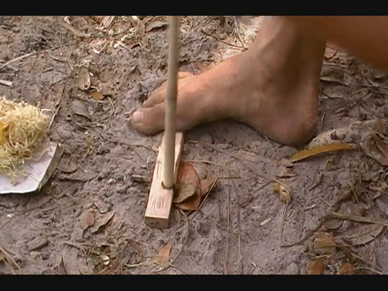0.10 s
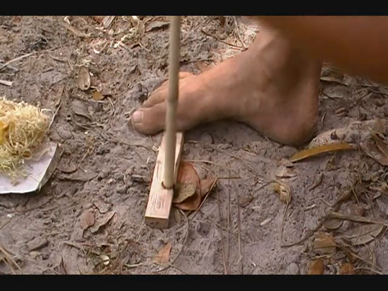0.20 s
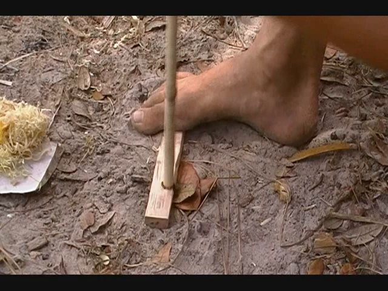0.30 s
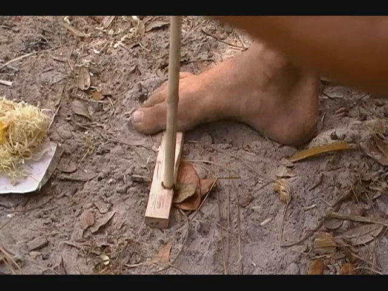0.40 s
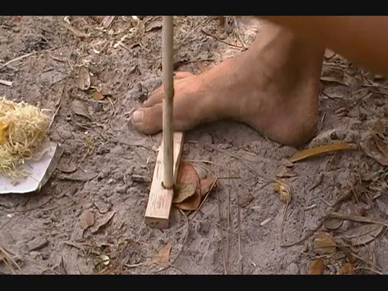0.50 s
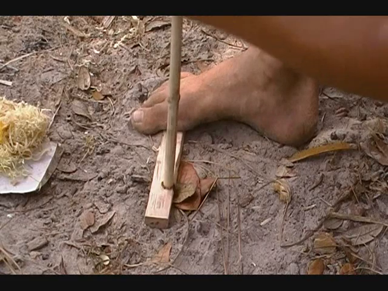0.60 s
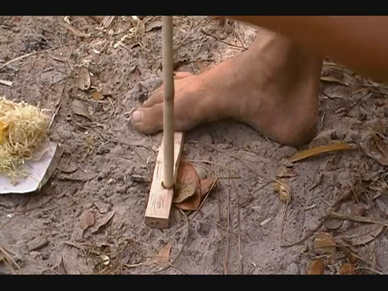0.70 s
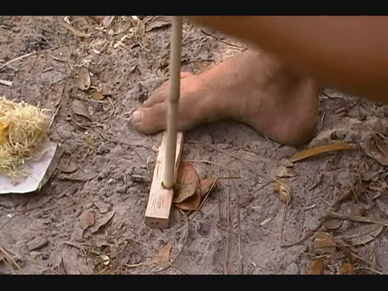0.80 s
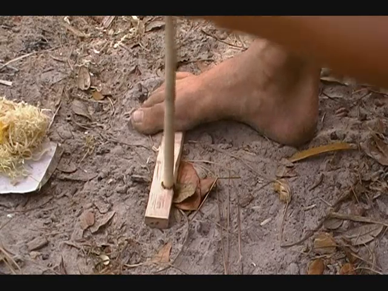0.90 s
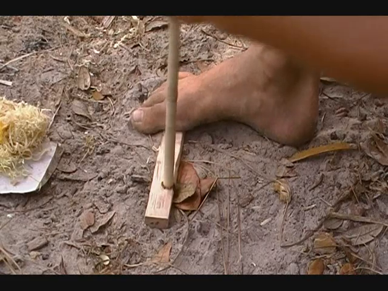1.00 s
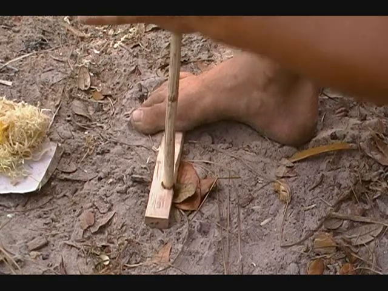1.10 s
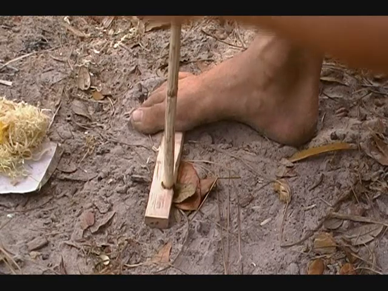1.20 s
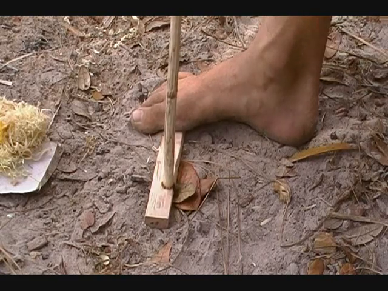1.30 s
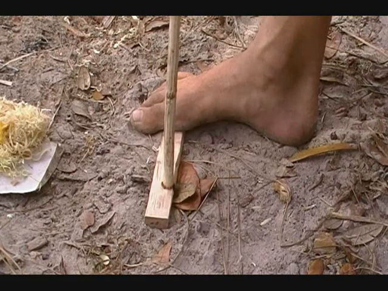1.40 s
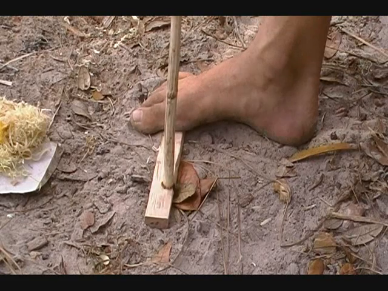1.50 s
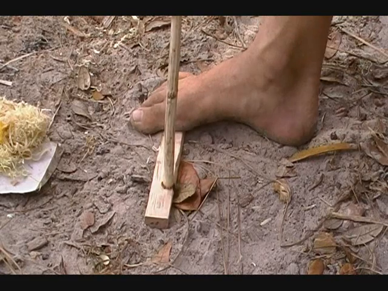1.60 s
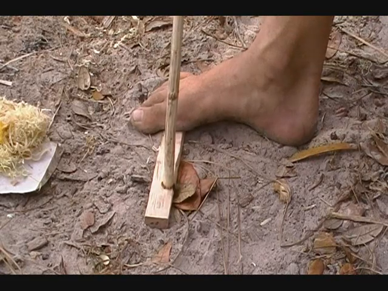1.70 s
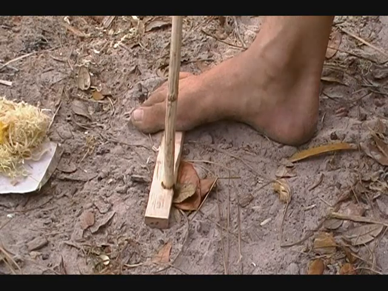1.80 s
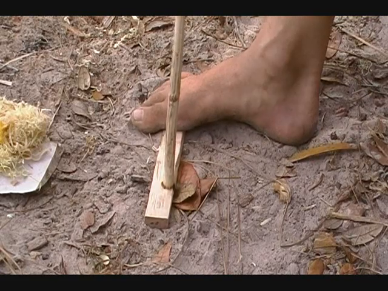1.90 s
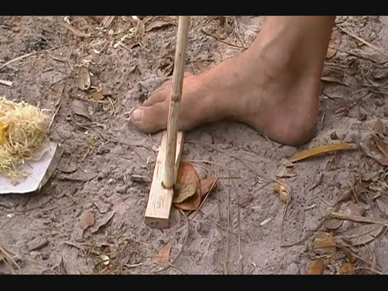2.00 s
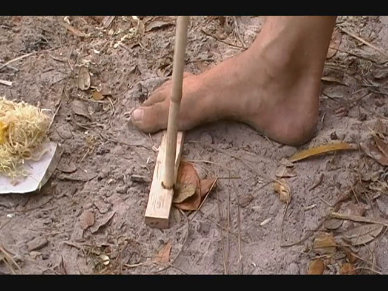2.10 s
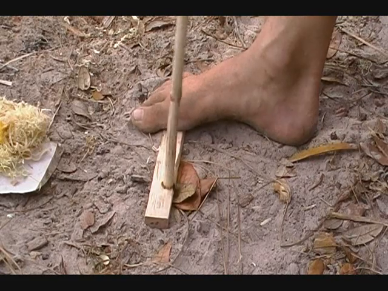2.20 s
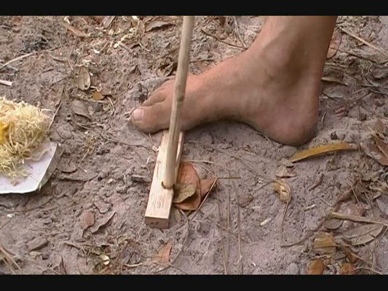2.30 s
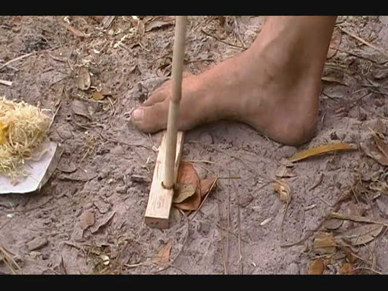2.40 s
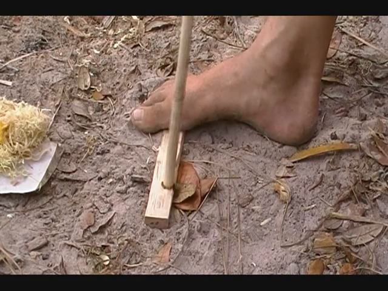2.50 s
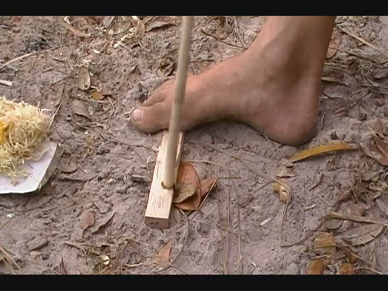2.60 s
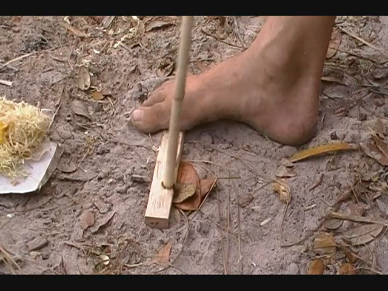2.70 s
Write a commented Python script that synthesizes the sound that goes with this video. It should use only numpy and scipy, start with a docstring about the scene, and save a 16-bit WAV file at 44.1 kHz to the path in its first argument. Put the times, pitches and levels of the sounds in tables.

```python
"""A wooden spindle is rolled between the palms in the socket of a board, in front of the microphone outdoors:
about nine dry, gritty strokes a second, made of friction noise and wood modes that follow the turning speed.
It pauses while the hands go back to the top; the wood rings briefly, as short tones, where the tip catches.
Behind it a motor vehicle, probably a six-cylinder, drones past as harmonic lines with a wash of tyre noise."""
import sys
import numpy as np
from scipy import signal
from scipy.fft import rfft, irfft
from scipy.io import wavfile

SR = 44100
rng = np.random.default_rng(int(sys.argv[2]) if len(sys.argv) > 2 else 0)


def transcribe(u):
    """Save the signal u as a 16-bit wav file named by the first command-line argument.

    u: samples, shape (n,) or (channels, n), limited to [-1, 1]; the rate is SR.
    q: integer samples, one column per channel.
    """
    v = np.clip(np.atleast_2d(u).T, -1, 1)
    q = np.round(v * 32767).astype(np.int16)
    wavfile.write(sys.argv[1], SR, q)


N = 121275
T = np.arange(N) / SR  # t/s


def undb(db):
    """Amplitude factor of a level in dB."""
    return 10 ** (np.asarray(db) / 20)


def unit(x):
    """Scale to an RMS of 1."""
    return x / np.sqrt(np.mean(x ** 2))


def curve(rows, axis=1):
    """One column of a table, joined by straight lines in time."""
    rows = np.array(rows)
    return np.interp(T, rows[:, 0], rows[:, axis])


def shape(x, points):
    """Filter by (f/Hz, gain/dB) points, joined on a logarithmic frequency axis."""
    hz, db = np.array(points).T
    f = np.maximum(np.arange(N // 2 + 1) * SR / N, 1)
    gain = undb(np.interp(np.log(f), np.log(hz), db))
    return irfft(rfft(x) * gain, N)


def noise():
    """White noise with spread 1."""
    return rng.standard_normal(N)


def walk(rate):
    """Smooth chance with spread 1, changing about rate times a second."""
    f = np.arange(N // 2 + 1) * SR / N
    return unit(irfft(rfft(noise()) / (1 + (f / rate) ** 4), N))


def ring(hz, width_hz):
    """A resonance driven by friction: a narrow band of noise whose centre may move."""
    phase = 2 * np.pi * np.cumsum(hz + 0 * T) / SR
    in_phase = walk(width_hz / 2) * np.cos(phase)
    quadrature = walk(width_hz / 2) * np.sin(phase)
    return unit(in_phase + quadrature)


def stereo(mid, side):
    """Left and right from mid and side."""
    return np.array([mid + side, mid - side])


DRILL_SIDE_DB = -9  # side relative to mid


def wide(make):
    """Stereo image from two independent draws: one in the middle, a weaker one at the sides."""
    return stereo(make(), undb(DRILL_SIDE_DB) * make())


GRAINS_PER_S, GRAIN_SPREAD_DB = 9000, 1


def grit(colour):
    """Dense tiny slips of wood fibre and dust, coloured by the wood."""
    happens = rng.random(N) < GRAINS_PER_S / SR
    size = undb(GRAIN_SPREAD_DB * np.minimum(rng.exponential(size=N), 4))
    slips = happens * size * np.sign(noise())
    return unit(shape(slips, colour))


# strokes of the spindle: start t/s, length t/s, rasp level/dB, hiss level/dB, low ring level/dB,
# fastest point [share of the stroke]
STROKES = [(-.035, 0.1, -41, -42, -53, 0.46), (0.067, 0.11, -37, -43.5, -72, 0.48),
           (0.179, 0.11, -40.5, -42, -53, 0.37), (0.289, 0.11, -38, -45, -57, 0.38),
           (0.396, 0.11, -39.5, -43, -57, 0.38), (0.503, 0.12, -39.5, -44, -56, 0.37),
           (0.608, 0.12, -40, -43.5, -48, 0.37), (0.722, 0.11, -39.5, -44.5, -70, 0.44),
           (0.832, 0.12, -41, -44.5, -51, 0.3), (0.94, .1, -42, -47, -65, 0.46),
           (1.055, .108, -40.5, -45, -61, 0.33), (1.163, 0.12, -48.5, -50.5, -57, 0.4),
           (2.282, 0.15, -46, -44, -53, 0.54), (2.433, 0.098, -38.5, -37.5, -48, 0.47),
           (2.545, .096, -41, -39.5, -49, 0.365), (2.649, 0.11, -40.5, -38, -42, 0.36)]
# modes of board and spindle: f/Hz, width f/Hz, level/dB relative to the rasp
WOOD_MODES = [(2308, 150, -21.5), (2860, 100, -18), (3287, 100, -15), (3956, 380, -11.5), (4414, 880, -8),
              (4970, 840, -14), (5710, 910, -14)]
# colour of the rasping wood fibre: f/Hz, level/dB
RASP_COLOUR = [(500, -16.5), (1500, -6.5), (2100, -8), (2700, -0.5), (3100, -3.5), (3500, 2), (4400, 0),
               (5300, 4), (6200, -2.5), (7300, -6.5), (10000, -16), (16000, -45)]
# colour of the hissing dust, also heard in scuffs and slides: f/Hz, level/dB
HISS_COLOUR = [(2000, -69), (4500, -1), (6000, 1.5), (7200, 1.5), (8500, 4.5), (10000, 2.5), (12000, -2.5),
               (14500, -10.5), (16000, -21)]
RASP_POWER, HISS_POWER = 1.21, 1.43  # how steeply each level follows the speed
LOW_RING_HZ, LOW_RING_WIDTH_HZ = 2260, 670  # centre at full speed
RING_RISE = .22  # share by which the low ring is higher when the spindle stands still
WOOD_FLICKER_DB, CHATTER_DB = 8, 1.0
BROAD_DB = -2.5  # broad grit relative to the rasp
REVERSAL_DB = -19.5  # dust that keeps moving while the spindle turns round, relative to the stroke's hiss


def spindle():
    """Each stroke speeds up from rest and slows again; rasp, hiss and low ring follow its speed.
    The turning tip drives now one mode of the wood, now another."""
    rasp, hiss, low, pace, dust = (np.zeros(N) for _ in range(5))
    for start, length, rasp_db, hiss_db, low_db, fastest in STROKES:
        turn = np.interp(T, [start, start + length * fastest, start + length], [0, .5, 1])
        speed = np.abs(np.sin(np.pi * turn))
        rasp += undb(rasp_db) * speed ** RASP_POWER
        hiss += undb(hiss_db) * speed ** HISS_POWER
        low += undb(low_db) * speed ** 2
        pace += speed
        from_middle = (T - start - length / 2) / (0.48 * length)
        dust += undb(hiss_db + REVERSAL_DB) * np.exp(-from_middle ** 4)

    wood = np.zeros((2, N))
    for hz, width, db in WOOD_MODES:
        flicker = WOOD_FLICKER_DB * np.tanh(walk(23))
        wood += undb(db + flicker) * wide(lambda: ring(hz, width))
    broad = undb(BROAD_DB) * wide(lambda: grit(RASP_COLOUR))
    low_hz = LOW_RING_HZ * (1 + RING_RISE * (1 - pace))

    sound = rasp * (wood + broad)
    sound += np.hypot(hiss, dust) * wide(lambda: grit(HISS_COLOUR))
    sound += low * wide(lambda: ring(low_hz, LOW_RING_WIDTH_HZ))
    return sound * undb(CHATTER_DB * walk(110))


# the tip catches and the wood sings briefly: t/s, f/Hz, level/dB
CATCHES = [(0.043, 4400, -45), (.108, 3404, -37.5), (0.137, 3350, -35), (0.203, 3200, -36),
           (0.211, 3400, -34), (.216, 4280, -37), (.252, 4350, -38), (.355, 3350, -38),
           (0.419, 2450, -40.5), (0.423, 3335, -36), (0.427, 2800, -44), (.572, 3400, -38),
           (0.643, 2976, -36), (.648, 3970, -36), (.652, 5100, -36), (0.789, 2950, -38),
           (.786, 3580, -41.5), (.805, 2250, -46.5), (0.855, 2850, -41), (.908, 2900, -49),
           (.985, 3400, -41), (0.999, 2400, -43), (1.078, 2850, -47), (1.113, 4500, -35.5),
           (1.121, 2827, -40.5), (2.381, 3950, -42), (2.452, 3930, -39), (2.48, 4400, -40),
           (2.586, 2000, -40.5), (2.608, 3330, -38), (2.697, 2200, -40), (2.718, 5000, -37)]
CATCH_S, CATCH_WIDTH_HZ = 0.0095, 425.5  # half width in time (to 1/e), spread of the wobbling pitch
CATCH_GRIT_DB = 2.8  # rough flicker of the level


def catches():
    """Stick and slip lock on to a mode of the wood for a few milliseconds."""
    out = np.zeros((2, N))
    wobble_hz = CATCH_WIDTH_HZ / 2 * walk(CATCH_WIDTH_HZ)
    for at, hz, db in CATCHES:
        phase = 2 * np.pi * (np.cumsum(hz + wobble_hz) / SR + rng.random())
        swell = np.exp(-((T - at) / CATCH_S) ** 2)
        out += undb(db) * swell * np.sin(phase)
    return out * undb(CATCH_GRIT_DB * wide(lambda: walk(350)))


# knocks and scuffs of the spindle in its socket, some as a stroke breaks away:
# t/s, wood level/dB, hiss level/dB, decay t/s (to 1/e)
SCUFFS = [(.174, -41, -62, .003), (.186, -45, -57, 0.0087), (1.898, -44, -58, 0.0046),
          (2.178, -44, -59.5, 0.019), (2.442, -47, -47, .008), (2.548, -49.5, -39.5, 0.016),
          (2.656, -43.5, -37, 0.0074)]
# palms slide up the stick: t/s, half width t/s (to 1/e), level/dB
SLIDES = [(1.87, 0.019, -58.5), (2.19, .03, -68), (2.3, 0.016, -57)]
# colour of the knocked wood: f/Hz, level/dB
KNOCK_COLOUR = [(400, -19), (1500, -1), (2400, 8), (3500, 0), (5600, -10), (8000, -13), (15000, -35)]


def handling():
    """The spindle knocks in its socket with a sudden start and a decay; the palms slide along it."""
    knocks, rubs = np.zeros(N), np.zeros(N)
    for at, wood_db, hiss_db, decay in SCUFFS:
        fade = (T >= at) * np.exp(-np.abs(T - at) / decay)
        knocks += undb(wood_db) * fade
        rubs += undb(hiss_db) * fade
    for at, half, db in SLIDES:
        rubs += undb(db) * np.exp(-((T - at) / half) ** 2)
    return knocks * wide(lambda: grit(KNOCK_COLOUR)) + rubs * wide(lambda: grit(HISS_COLOUR))


SCATTER_DB, SCATTER_T60_S = -13.5, 0.12


def scatter_tail():
    """Decaying noise of unit energy that begins 4 ms after the direct sound."""
    coloured = shape(noise(), [(3000, -2), (7000, -10.5), (14000, -4)])
    tail = coloured * undb(-60 * T / SCATTER_T60_S) * (T > .004)
    return unit(tail) / np.sqrt(N)


def surroundings(x):
    """Ground and leaves scatter a short, dull tail back."""
    echo = [signal.fftconvolve(channel, scatter_tail())[:N] for channel in x]
    return x + undb(SCATTER_DB) * np.array(echo)


# firing rate of the engine: t/s, f/Hz
FIRING = [(0, 102.8), (.3, 108.3), (.6, 114.8), (.75, 118.9), (.9, 124.2), (1.05, 126), (1.2, 128.1),
          (1.35, 130.1), (1.5, 125.7), (1.65, 120), (1.8, 116.5), (1.95, 113.1), (2.1, 107.1), (2.39, 103),
          (2.54, 99.3), (2.75, 102.2)]
# strongest engine lines: t/s, level/dB at 1, 4/3, 3/2, 2, 7/6 and 5/3 times the firing rate
DRONE = [(0, -43.5, -61, -47, -67, -46, -44), (.27, -38.5, -79, -44, -60, -42, -44),
         (.55, -35, -49, -39.5, -58, -43, -53), (.75, -30, -51, -36.5, -59, -57, -54),
         (.86, -31, -40, -45.5, -58, -56, -57), (1.03, -26.5, -37.5, -45, -47, -57, -55),
         (1.11, -20, -36.5, -46, -37.5, -50, -47), (1.19, -18.5, -37.5, -47, -41, -48, -47),
         (1.31, -26.5, -40.5, -44.5, -48, -43, -53.5), (1.44, -21.5, -37, -48, -37.5, -45, -46),
         (1.55, -19, -34, -36, -37, -47, -46), (1.74, -29, -45, -42, -48, -49, -49),
         (1.9, -34, -43, -67, -45, -41, -65), (1.96, -29.5, -44, -36, -64, -61, -63),
         (2.005, -54, -36.5, -50, -67, -48, -54), (2.06, -31.5, -38.5, -43, -69, -56, -48),
         (2.18, -36.5, -48, -55, -67, -59, -53), (2.35, -35.5, -60, -38.5, -54, -55, -48.5),
         (2.47, -35.5, -66, -37.5, -56, -61, -50), (2.57, -49, -65, -42.5, -60, -44, -66),
         (2.64, -50, -60, -42.5, -73, -66, -57), (2.7, -36, -72, -48, -76, -68, -64),
         (2.75, -48, -60, -61, -67, -60, -54)]
# weaker lines from uneven cylinders: multiple of the cycle rate, level/dB where the nearness is 0 dB
UNEVEN = [(2, -59.5), (3, -61), (4, -54.5), (5, -56), (11, -63), (13, -56), (14, -60.5), (15, -56),
          (17, -59.5), (21, -64.5), (22, -67.5), (24, -61.5)]
# nearness of the vehicle, also for the tyres: t/s, level/dB
NEAR = [(0, -10.5), (.4, -5), (.75, -3.5), (.95, -0.5), (1.12, 1.5), (1.3, 0.5), (1.55, 1.5), (1.75, -0.5),
        (2.0, -3.5), (2.2, -5), (2.75, -3)]
# colour of the boom around the lines: f/Hz, level/dB
BOOM_COLOUR = [(50, -22), (85, -23), (105, 3), (125, 13), (140, 9.5), (160, 0), (185, -18), (230, -23),
               (400, -53)]
BOOM_DB = -48  # where the nearness is 0 dB
THIRD_DB = -12  # line at 3 times the firing rate, relative to the one at 2 times
UNEVEN_FOLLOWS, WAVER_DB = 0.92, -0.1  # share of the nearness that weak lines and boom follow; slow waver
ENGINE_PAN_DB = -.45  # left relative to right


def engine():
    """Lines of the firing rate and of the slower six-cylinder cycle, with a diffuse boom around them."""
    cycle = 2 * np.pi * np.cumsum(curve(FIRING)) / SR / 6  # six firings to a cycle

    def line(order, db):
        """Sine at a multiple of the cycle rate, with its RMS level in dB."""
        return np.sqrt(2) * undb(db) * np.sin(order * cycle + 2 * np.pi * rng.random())

    out = np.zeros(N)
    for column, order in enumerate([6, 8, 9, 12, 7, 10], start=1):
        out += line(order, curve(DRONE, axis=column))
    out += line(18, curve(DRONE, axis=4) + THIRD_DB)

    near = UNEVEN_FOLLOWS * curve(NEAR)
    for order, db in UNEVEN:
        out += line(order, db + near + WAVER_DB * walk(4.2))
    out += undb(BOOM_DB + near) * unit(shape(noise(), BOOM_COLOUR))
    return out * undb(np.array([[ENGINE_PAN_DB], [-ENGINE_PAN_DB]]) / 2)


# colour of the tyre noise: f/Hz, level/dB
TYRE_COLOUR = [(25, -7), (45, 4), (80, 10.5), (150, 11), (230, 6), (330, -1), (480, -2.5), (700, -3),
               (1100, -0.5), (1600, -4), (2200, -7), (3300, -9), (4800, -16), (6500, -23.5), (10000, -31),
               (12000, -40), (16000, -49)]
# stereo width of the tyre noise: f/Hz, side level/dB relative to mid
TYRE_SIDE = [(25, -10), (70, -7), (160, -8), (300, -8.5), (600, -11.5), (1200, -6.5), (3000, -1),
             (12000, 5)]
TYRES_DB = -43  # where the nearness is 0 dB
TYRE_DULLING = 0.53  # extra dB of treble per dB of nearness
WHINE_HZ, WHINE_DB = 7970, -75.5


def road():
    """Tyre noise swells and brightens as the vehicle comes near; a thin high whine hangs in the air."""
    mid = unit(shape(noise(), TYRE_COLOUR))
    side = shape(unit(shape(noise(), TYRE_COLOUR)), TYRE_SIDE)
    wash = stereo(mid, side)
    dull = signal.sosfiltfilt(signal.butter(2, 2200, fs=SR, output="sos"), wash)
    treble = wash - dull
    near = curve(NEAR) + 0.4 * walk(22)  # with a slight flutter
    tyres = undb(TYRES_DB + near) * (dull + undb(TYRE_DULLING * near) * treble)
    return tyres + undb(WHINE_DB) * ring(WHINE_HZ, 160)


# the tyres' midrange roar, which lingers after the pass: t/s, level/dB
ROAR = [(0, -55), (.7, -64), (1.05, -48), (1.3, -61.5), (1.55, -56), (1.85, -54), (2.1, -54.5),
        (2.4, -60.5), (2.75, -57)]
# colour of the roar: f/Hz, level/dB
ROAR_COLOUR = [(300, -31), (480, -0.5), (700, -2.5), (950, -1), (1300, -4.5), (2000, -19), (4000, -36)]
ROAR_FLUTTER_DB = .8


def roar(side_db=-6):
    """The tread drums on the road: midrange noise with a fluttering level."""
    mid = unit(shape(noise(), ROAR_COLOUR))
    side = undb(side_db) * unit(shape(noise(), ROAR_COLOUR))
    level = undb(curve(ROAR) + ROAR_FLUTTER_DB * walk(8.1))
    return level * stereo(mid, side)


def air(hiss_db=-66):
    """Faint steady outdoor hiss."""
    colour = [(1000, 2), (5000, -5.5), (10000, -2.5), (12000, -12.5), (14500, -15), (16000, -21)]
    return undb(hiss_db) * wide(lambda: unit(shape(noise(), colour)))


def scene():
    """The drill with its scattered tail in front; vehicle and open air behind it."""
    drill = surroundings(spindle() + catches() + handling())
    vehicle = engine() + road() + roar()
    return drill + vehicle + air()


TOP_HZ = 15800


def record(dry):
    """The recorder behind the microphone cuts the top with a steep low-pass."""
    return signal.sosfilt(signal.ellip(10, .2, 80, TOP_HZ, fs=SR, output="sos"), dry)


dry = scene()
out = record(dry)
transcribe(out)
```